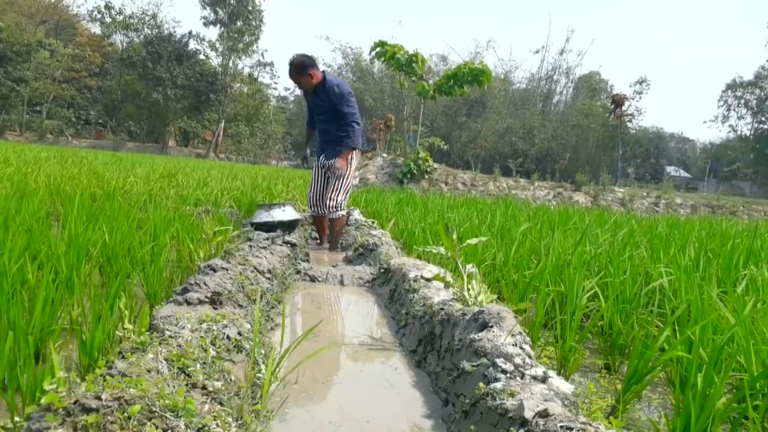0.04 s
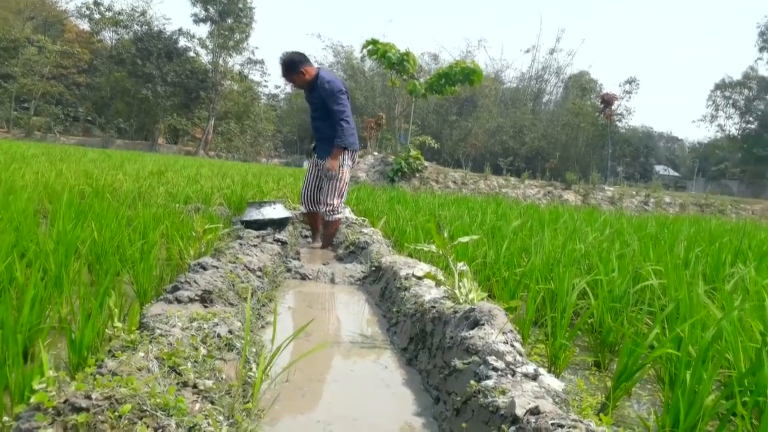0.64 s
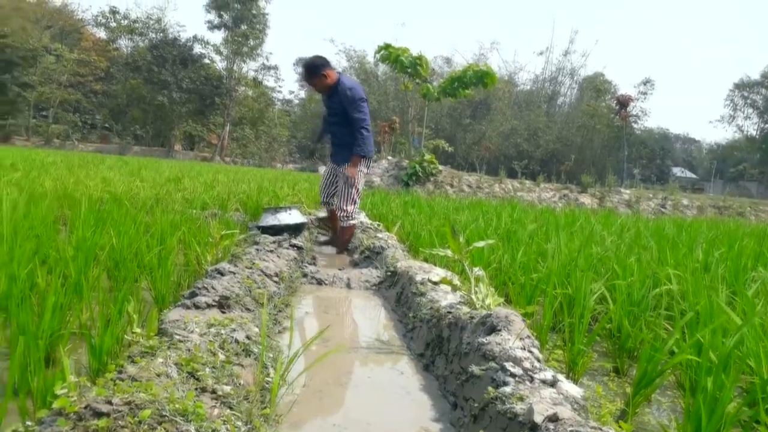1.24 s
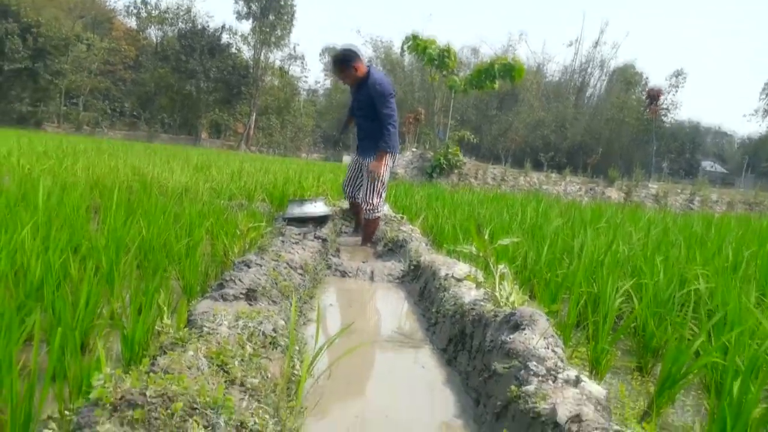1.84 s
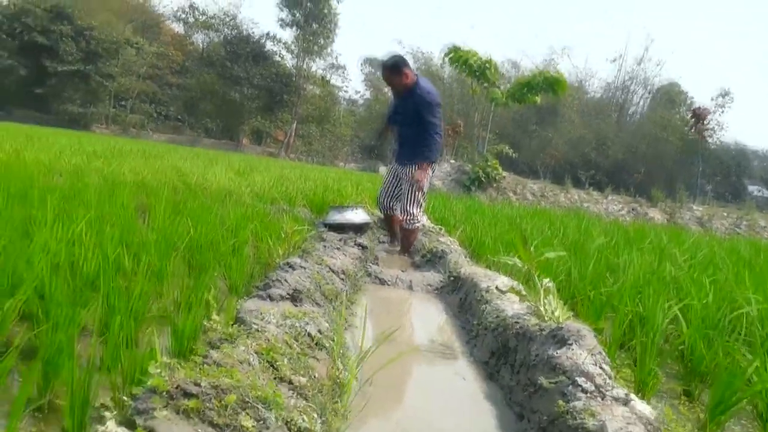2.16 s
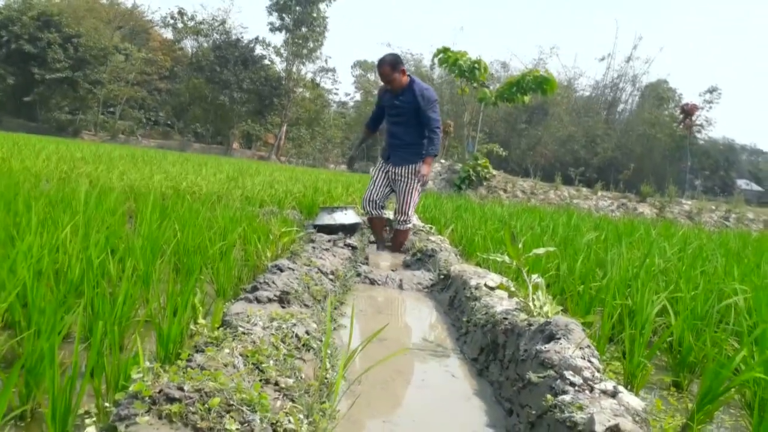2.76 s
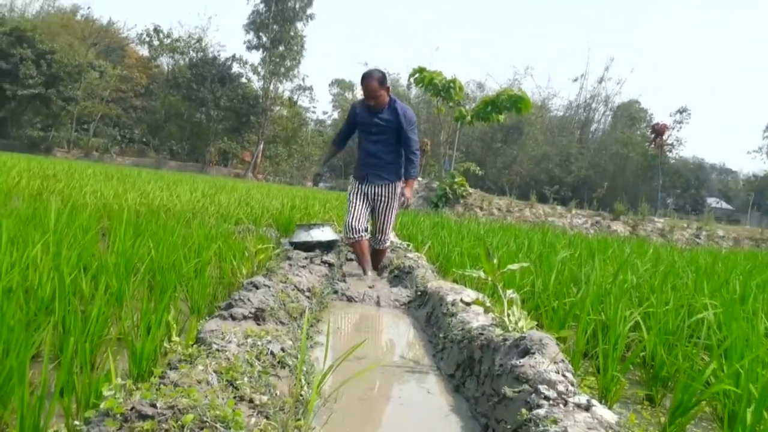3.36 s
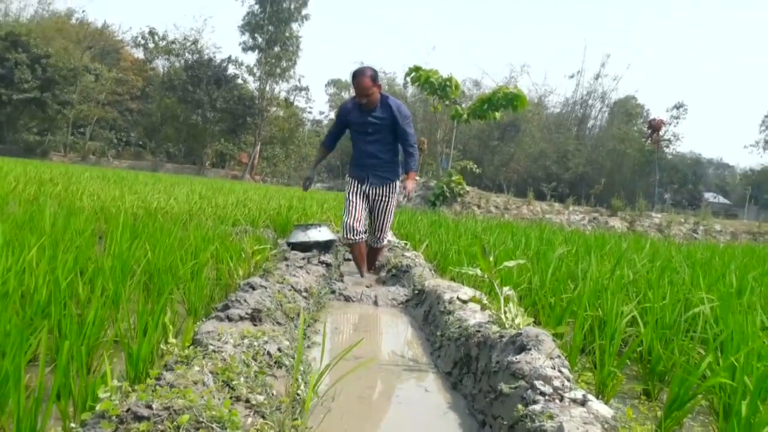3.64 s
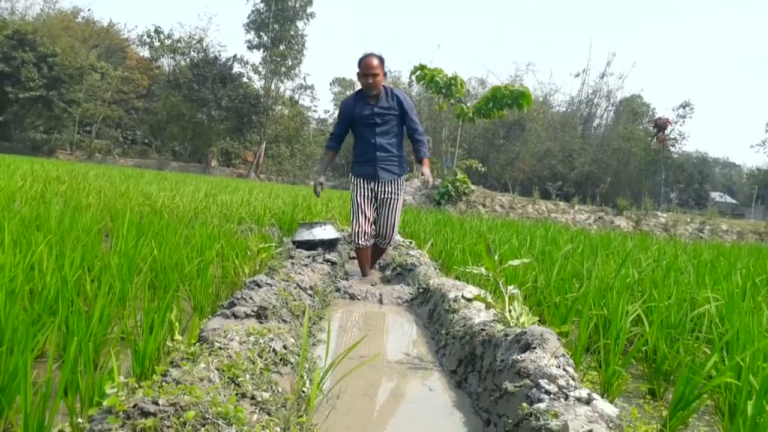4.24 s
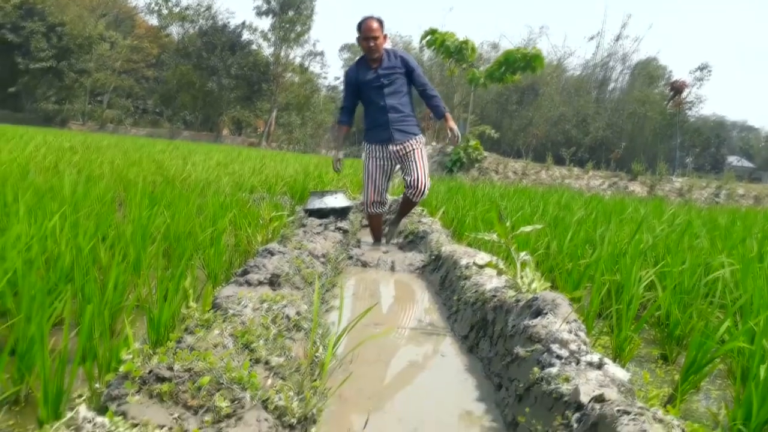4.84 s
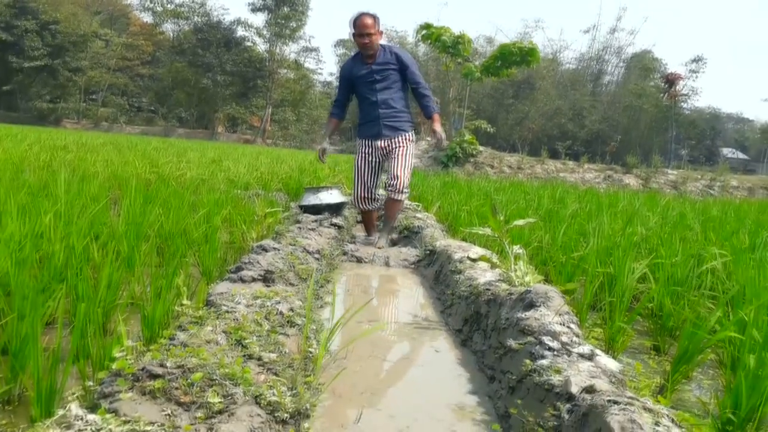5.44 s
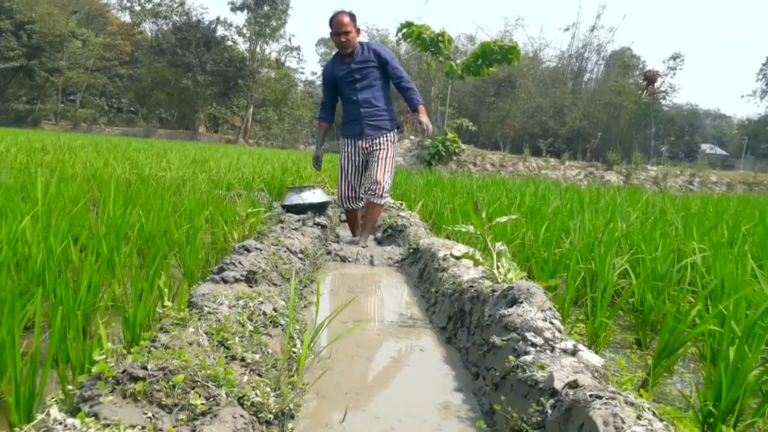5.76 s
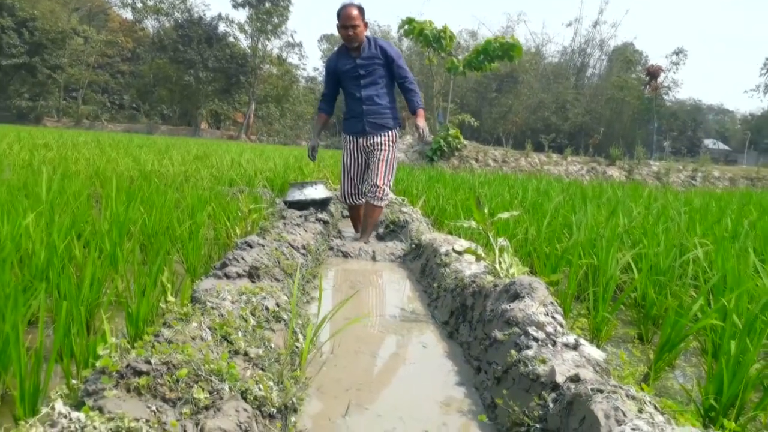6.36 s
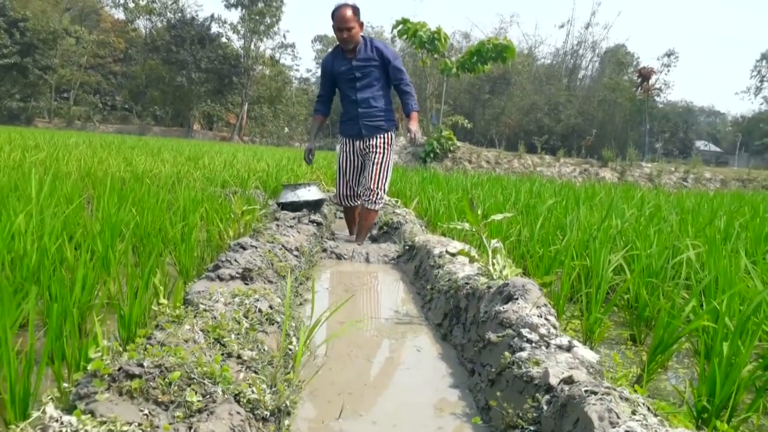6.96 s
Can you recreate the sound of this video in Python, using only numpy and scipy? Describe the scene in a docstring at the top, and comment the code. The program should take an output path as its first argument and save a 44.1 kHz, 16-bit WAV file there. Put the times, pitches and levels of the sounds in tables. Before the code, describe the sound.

Soft barefoot squelches in a wet, muddy channel under a repeating cuckoo whistle, other birds, crickets and a faint throbbing pump.

```python
"""A rice field. Small birds chirp first, over crickets, a far one-cylinder irrigation pump and low air hum.
From 0.5 s bare feet squelch along a muddy channel (air pockets pop, mud films snap, shallow water stirs)
and a cuckoo whistles about every 1.3 s. A kingfisher trills from 1.1 to 2.1 s. From 3.5 s hoarse calls
come from the trees. The heaviest step lands near 4.3 s; the small birds return near 5 s.
A tree line echoes all the birds."""
import sys
import numpy as np
from scipy import signal
from scipy.fft import rfft, irfft, next_fast_len
from scipy.io import wavfile
from scipy.ndimage import map_coordinates

SR = 44100
rng = np.random.default_rng(int(sys.argv[2]) if len(sys.argv) > 2 else 0)


def wav_record(signal):
    """Record a signal, one row per channel, as 16-bit PCM in the file named by sys.argv[1]."""
    frames = np.transpose(np.atleast_2d(signal))
    bounded = np.clip(frames, -1, 1)
    # unit amplitude maps onto the largest positive 16-bit level
    quanta = np.round(bounded * 32767).astype(np.int16)
    wavfile.write(sys.argv[1], SR, quanta)


N = 317961
T = np.arange(N) / SR

# Each row: crest time in seconds, dip pitch in Hz, crest pitch in Hz, level in dB before carry gain.
CUCKOO_CALLS = [(.638, 1312, 1579, -28), (2.002, 1358, 1650, -30.5), (3.335, 1474, 1664, -31),
                (4.68, 1500, 1740, -31.5), (5.915, 1538, 1780, -32.5), (7.27, 1477, 1703, -28)]
# How well the whistle carries. Each row: pitch in Hz, gain in dB.
CUCKOO_CARRY = [(1150, -8.5), (1350, -8), (1470, -5), (1560, 3), (1660, -2.5), (1780, -6)]
# Each row: middle in seconds, note level in dB, lead-in level in dB.
KINGFISHER_NOTES = [(1.16, -20, -19), (1.229, -16, -20.5), (1.302, -12.5, -29), (1.395, -17, -12.5),
                    (1.466, -17, -13), (1.538, -17, -16.5), (1.613, -16.5, -18), (1.68, -15, -20.5),
                    (1.753, -15.5, -24.5), (1.823, -15.5, -29.5), (1.897, -16, -33), (1.982, -18.5, -32)]
# Each row: time in seconds, pitch in Hz, base level in dB.
HOARSE_CALLS = [(3.472, 2780, -26), (4.058, 2800, -32), (4.629, 2674, -35), (5.199, 2810, -32),
                (5.901, 2760, -37.5), (6.76, 2940, -36.5)]
# Syllables of one call. Each row: delay and length in seconds, pitch ratio, glide in octaves, gain in dB.
HOARSE_PHRASE = [(0, .076, 0.99, -0.207, 2), (0.067, 0.066, .925, -0.174, 1)]
# Each row: middle and length in seconds, pitch in Hz, glide in octaves, relative level in dB.
SONGBIRD_CHIRPS = [(.008, 0.052, 2342, 0.38, -28.5), (.04, 0.19, 3675, -0.24, -41.5),
                   (.16, 0.13, 4880, 0.84, -44), (.23, 0.097, 4680, -1.1, -35.5),
                   (4.86, 0.16, 4440, -0.37, -43), (4.99, .07, 3160, -0.23, -35),
                   (5.052, 0.044, 3500, -0.66, -26.5), (5.07, 0.13, 4350, -0.32, -36.5)]
# Air pockets opening. Each row: start in seconds, relative level in dB, pitch in Hz, T60 in seconds.
AIR_POPS = [(.525, -13.5, 1324, .008), (.832, -13, 1240, 0.0053), (.854, -19, 2860, 0.016),
            (1.117, -17.5, 2100, 0.0086), (3.069, -29, 4930, .019), (3.49, -7.5, 1310, 0.004),
            (3.727, -13, 1780, 0.011), (4.2485, -2.5, 2120, 0.013), (4.268, -8, 1980, 0.011),
            (4.286, -4, 1390, 0.0076), (4.298, -27.5, 506, 0.16), (4.381, -13.5, 3040, 0.027),
            (4.513, -22.5, 832, 0.05), (4.538, -17, 2190, 0.022), (4.584, -16.5, 1144, 0.027),
            (5.113, -10.5, 2140, .027), (5.302, -14.5, 827, 0.029), (5.3028, -11.5, 2157, 0.022),
            (5.3525, -16.5, 2090, 0.031), (5.54, -22, 2150, .026), (5.572, -23.5, 1660, .029),
            (5.792, -13.5, 2710, 0.018), (5.99, -13, 2140, 0.0099), (6.256, -23.5, 1113, 0.068),
            (7.081, -18.5, 2240, 0.0082), (7.1845, -7, 2220, 0.029)]
# Shrinking suction cavities. Each row: as for AIR_POPS, then pitch rise in octaves.
SUCTION_SQUELCHES = [(.864, -26.5, 1534, 0.042, 2.2), (4.294, -17.5, 1485, 0.091, 2.4),
                     (6.29, -44, 1117, 0.09, 1.8), (7.13, -19.5, 943, 0.054, 0.87)]
# Mud films snapping. Each row: start in seconds, relative level in dB, pitch in Hz.
MUD_CLICKS = [(.601, -15, 7940), (.85, -18, 4800), (3.176, -25, 6300), (4.168, -17.5, 4270),
              (4.1833, -3.5, 7250), (4.307, -30, 7300), (4.387, -17, 8100), (4.413, -15, 5700),
              (4.516, -14.5, 7050), (4.678, -17, 8240), (5.113, -10.5, 8000), (5.16, -10.5, 7900),
              (5.214, -12.5, 8100), (5.226, -8, 7440), (5.353, -12, 7250), (5.541, -14.5, 7700),
              (5.571, -14.5, 11900), (5.652, -4, 6760), (5.822, -13.5, 7200), (6.182, -16.5, 4900),
              (7.082, -10.5, 8600), (7.097, -14, 8250), (7.184, -5.5, 6900)]
# Each row: peak time in seconds, relative level in dB, build-up and settling times in seconds.
FOOT_MOVES = [(0.539, -37.5, 0.06, 0.45), (1.12, -42.5, 0.08, 0.97), (4.13, -37.5, 0.022, 0.54),
              (4.305, -28.5, 0.11, 0.56), (5.26, -33.5, 0.4, 0.32), (5.798, -40.5, 1, 0.41),
              (6.698, -40.5, 0.043, 0.24), (7.16, -31.5, 0.18, 0.47)]
# Far insects. Each row: frequency in Hz, relative level in dB.
CHORUS_SPECTRUM = [(5400, -71), (5650, -12), (6280, -3), (6550, -12.5), (6800, -12.5), (7050, -17),
                   (7500, -20), (8050, -14.5), (8550, -8), (9050, -7), (9450, -52)]
# Each row: time in seconds, level in dB.
CRICKET_LEVELS = [(0, -48.5), (2.5, -49), (2.65, -70), (4.6, -51), (5.6, -45.5), (7.2, -53)]
# Each entry: end of a bush cricket's buzz in seconds.
BUZZ_ENDS_S = [1.631, 3.455, 5.22, 6.97]
# Pump pipe. Each row: frequency in Hz, relative level in dB, T60 in seconds.
EXHAUST_MODES = [(88, 5.5, 0.1), (120.5, -2.5, 0.23), (241, -15, 0.25)]
# Each row: frequency in Hz, relative level in dB.
AIR_SPECTRUM = [(25, -21), (55, 2.5), (110, -2), (170, -3.5), (420, -6), (560, -16.5), (900, -14.5),
                (2000, -20), (3700, -30.5), (11000, -35.5), (16000, -35)]
# Tree-line echo. Each row: frequency in Hz, T60 in seconds.
TREE_DECAY = [(500, 0.97), (2500, 0.61), (8000, 0.78)]


def cuckoo(sag_s=0.125, climb_s=0.145, drop_s=0.18, fall_s=0.075, fade_s=0.064, floor_hz=1090):
    """A pure, fluttering whistle sags, climbs to a crest and falls away."""
    out, t = np.zeros(N), np.arange(0, sag_s + climb_s + drop_s, 1 / SR)
    crest_s = sag_s + climb_s
    sag = 0.09 * np.maximum(1 - t / sag_s, 0) ** 2
    climb = np.sin(np.pi / 2 * np.clip((t - sag_s) / climb_s, 0, 1)) ** 2
    late = (np.maximum(t - crest_s, 0) / fall_s) ** 2.76
    swell = np.clip(np.minimum(t, t[-1] - t) / fade_s, 0, 1)
    for s, dip_hz, crest_hz, db in CUCKOO_CALLS:
        hz = dip_hz * (1 + sag) + (crest_hz - dip_hz) * climb + (floor_hz - crest_hz) * late / (1 + late)
        level_db = db + along(CUCKOO_CARRY, hz) + 4 * wobble(46.1, len(t))
        add(out, s - crest_s, swell * amp(level_db) * np.sin(phase(hz)))
    return out


def kingfisher(start_hz=2903, end_hz=2605, sink_s=0.302, tighten_s=0.23):
    """A trill sinks and tightens; each note is a flatter lead-in and a falling syllable."""
    rows = []
    for s, db, lead_db in KINGFISHER_NOTES:
        age_s = s - KINGFISHER_NOTES[0][0]
        hz = end_hz + (start_hz - end_hz) * np.exp(-age_s / sink_s)
        stretch = 1 + 0.76 * np.exp(-age_s / tighten_s)
        rows.append((s - 0.028, 0.024 * stretch, hz * 1.028 ** stretch, -0.08 * stretch, lead_db))
        rows.append((s, 0.035 * stretch, hz, -0.264, db))
    rows.append((2.094, 0.05, 2564, 0.278, -28.5))  # soft upward closing note
    return syllables(rows, second_db=-20.5, third_db=-25.5, waver=0.0072, rasp_db=2,
                     tract_db_per_oct=37, hold=0.88)


def hoarse_bird():
    """One rough, falling two-syllable phrase, repeated at varying pitch and level."""
    rows = [(s + delay_s, length_s, hz * ratio, glide_oct, db + gain_db)
            for s, hz, db in HOARSE_CALLS
            for delay_s, length_s, ratio, glide_oct, gain_db in HOARSE_PHRASE]
    return syllables(rows, second_db=-12.5, third_db=-20, waver=0.02, rasp_db=3,
                     tract_db_per_oct=16, hold=0.2)


def songbirds():
    """Thin, wavering chirps with weak harmonics."""
    return syllables(SONGBIRD_CHIRPS, second_db=-33, third_db=-46, waver=0.029, rasp_db=4,
                     tract_db_per_oct=10, hold=0)


def syllables(rows, second_db, third_db, waver, rasp_db, tract_db_per_oct, hold):
    """Each syllable lingers on its pitch (hold 0-1) and fades as it glides off the throat's resonance."""
    out = np.zeros(N)
    for s, length_s, hz, glide_oct, db in rows:
        u = np.linspace(-1, 1, int(length_s * SR))
        bend = u * (1 - hold + hold * u * u)
        octaves = glide_oct * bend / 2 - 0.27 * abs(glide_oct) * bend ** 2
        rad = phase(hz * 2 ** octaves * (1 + waver * wobble(703, len(u))))
        tone = np.sin(rad) + amp(second_db) * np.sin(2 * rad) + amp(third_db) * np.sin(3 * rad)
        level_db = db - tract_db_per_oct * abs(octaves) + rasp_db * wobble(497, len(u))
        add(out, s - length_s / 2, amp(level_db) * tone * (1 - u * u) ** 0.97)
    return out


def birds():
    """Near foliage smears the three higher voices; the tree line answers all four."""
    whistle, trill, calls, chirps = cuckoo(), kingfisher(), hoarse_bird(), songbirds()
    near = amp(-4.5) * echo(trill, t60_scale=0.12, onset_s=0.0056)
    near += amp(-10.5) * echo(chirps + calls, t60_scale=0.37, onset_s=0.0022)
    to_trees = amp(-8.5) * whistle + amp(-12) * trill + amp(-5) * (chirps + calls)
    far = echo(to_trees, t60_scale=1, onset_s=0.023)
    return whistle + trill + calls + amp(-2) * chirps + near + far


def pops(attack_s=0.00087, smack_t60_s=0.04):
    """Air pockets ring with a wet smack; squelches rise in pitch as the cavity shrinks."""
    rings, smacks, t = np.zeros(N), np.zeros(N), np.arange(SR // 8) / SR
    opening = 1 - np.exp(-t / attack_s)
    for s, db, hz, t60_s, rise_oct in [(*row, 0) for row in AIR_POPS] + list(SUCTION_SQUELCHES):
        octaves = rise_oct * np.minimum(t / t60_s, 1)
        rad = phase(hz * 2 ** octaves * (1 + 0.035 * wobble(456, len(t))))
        ring = np.sin(rad) + amp(-13 - 60 * t / t60_s) * np.sin(1.497 * rad)
        add(rings, s, amp(db + 5.5 - 60 * t / t60_s) * opening * ring)
        add(smacks, s, amp(db - 13 - 60 * t / smack_t60_s) * opening)
    hiss = noise([(200, -18), (800, -3), (2200, 11), (3500, -14), (6000, -4), (15000, -31.5)])
    return rings + smacks * hiss


def clicks(attack_s=0.00018, ring_t60_s=0.0065, crack_t60_s=0.02):
    """A snapping mud film gives a broad crack and a tiny high ring."""
    rings, cracks, t = np.zeros(N), np.zeros(N), np.arange(SR // 30) / SR
    tearing = 1 - np.exp(-t / attack_s)
    for s, db, hz in MUD_CLICKS:
        ring = np.sin(phase(hz * (1 + 0.012 * wobble(1200, len(t)))))
        add(rings, s, amp(db - 4 - 60 * t / ring_t60_s) * tearing * ring)
        add(cracks, s, amp(db - 9 - 60 * t / crack_t60_s) * tearing)
    hiss = noise([(500, -28), (2500, -9.5), (5000, -0.5), (8000, 5.5), (10000, -8.5), (15500, -7)])
    return rings + cracks * hiss


def stirred_water(range_db=17):
    """Each foot movement swells and settles, stirring up small bubbles and crackling mud."""
    slosh = grains(per_s=260, centre_hz=1964, spread=0.392, cycles=36, scatter_db=3.5)
    gurgle = grains(per_s=160, centre_hz=605, spread=0.32, cycles=9, scatter_db=1.5)
    crackle = grains(per_s=75, centre_hz=11160, spread=0.3, cycles=5.4, scatter_db=6.5)
    snaps = grains(per_s=40, centre_hz=7680, spread=0.11, cycles=6, scatter_db=3)
    wash = noise([(150, -31), (400, -12), (2500, -5), (4000, -17), (15000, -19.5)])
    wash *= amp(-10 + 4.1 * wobble(70))
    shallow = amp(-2.5) * slosh + amp(-8) * crackle + amp(-6.5) * snaps + wash
    swells = [amp(db - range_db * np.maximum((s - T) / build_s, (T - s) / settle_s))
              for s, db, build_s, settle_s in FOOT_MOVES]
    stir = np.max(swells, axis=0)
    depth = stir.max() * (stir / stir.max()) ** 1.62  # harder steps reach deeper water
    return stir * shallow + amp(-12) * depth * gurgle


def feet():
    """Bare feet in water and mud, with a faint foliage echo."""
    steps = stirred_water() + pops() + clicks()
    return steps + amp(-17) * echo(steps, t60_scale=0.34, onset_s=0.00079)


def insect_chorus():
    """Far insects merge into a flickering hiss with a faint high shimmer."""
    chorus = amp(-49 + 0.36 * wobble(1.4) + 0.87 * wobble(220)) * noise(CHORUS_SPECTRUM)
    return chorus + amp(-70 + 3 * wobble(2)) * band(12500, 400)


def cricket(chirp_hz=5.1, chirp_depth=0.57, stroke_hz=102):
    """Wing strokes pulse a narrow band, grouped into chirps."""
    chirps = np.sqrt(0.5 - 0.5 * chirp_depth * np.cos(2 * np.pi * chirp_hz * T))
    strokes = wing_strokes(stroke_hz + 2 * wobble(1.7), sharpness=0.22)
    return amp(curve(CRICKET_LEVELS)) * unit(chirps * strokes) * band(7880, 420)


def bush_cricket(length_s=0.72, stroke_hz=163):
    """Buzzes swell and stop; the wings slow as each one grows."""
    swell, u = np.zeros(N), np.linspace(0, 1, int(length_s * SR))
    for end_s in BUZZ_ENDS_S:
        add(swell, end_s - length_s, amp(-14 * (1 - u) ** 2))
    strokes = wing_strokes(stroke_hz - 22 * swell ** 8, sharpness=0.48)
    return amp(-42) * swell * strokes * band(6730, 270)


def wing_strokes(hz, sharpness):
    """One pulse per stroke, rms 1."""
    return unit(((1 + np.cos(phase(hz))) / 2) ** sharpness)


def pump(firing_hz=14.27, thud_db=-41, puff_db=-52):
    """Each firing rings the exhaust pipe and lets out a puff of gas."""
    thuds, t = np.zeros(N), np.arange(SR // 6) / SR
    pipe = sum(amp(db - 60 * t / t60_s) * np.sin(2 * np.pi * hz * t) for hz, db, t60_s in EXHAUST_MODES)
    thud = pipe * (1 - np.exp(-t / 0.0024))
    for s in np.arange(0, N / SR, 1 / firing_hz):
        add(thuds, s, amp(1.4 * rng.standard_normal()) * thud)
    gate = np.exp(-2 * (T * firing_hz % 1))
    puffs = unit(gate * noise([(40, -5), (130, 1), (400, -17.5), (700, -27)]))
    puffs = filtered(puffs, lambda hz: 1 / (1 + (hz / 900) ** 4))
    return amp(thud_db) * unit(thuds) + amp(puff_db) * puffs


def air(level_db=-42.5):
    """Low, even hum of open country."""
    return amp(level_db + wobble(8.7)) * noise(AIR_SPECTRUM)


def echo(x, t60_scale, onset_s):
    """Diffuse answer of foliage: a decaying noise tail with a soft start."""
    hz, t, spectra = signal.stft(rng.standard_normal(SR), SR, nperseg=256)
    t60_s = t60_scale * along(TREE_DECAY, hz)[:, None]
    tail = signal.istft(spectra * amp(-60 * t / t60_s), SR, nperseg=256)[1]
    tail *= 1 - np.exp(-(np.arange(len(tail)) / SR / onset_s) ** 2)
    return signal.fftconvolve(x, tail / np.linalg.norm(tail))[:N]


def grains(per_s, centre_hz, spread, cycles, scatter_db):
    """Damped rings of random time, pitch and size, rms 1."""
    count, t = int(per_s * N / SR), np.arange(SR // 100) / SR
    hz = np.clip(centre_hz * np.exp(spread * rng.standard_normal((count, 1))), 300, 15000)
    size = amp(scatter_db * np.minimum(rng.exponential(size=(count, 1)), np.pi))
    rings = size * np.sin(2 * np.pi * hz * t) * np.exp(-t * hz / cycles) * (1 - t / t[-1])
    indices = rng.integers(N, size=(count, 1)) + np.arange(len(t))
    return unit(np.bincount(indices.ravel(), rings.ravel(), N)[:N])


def noise(spectrum):
    """Noise shaped by (Hz, dB) points, rms 1."""
    return unit(filtered(rng.standard_normal(N), lambda hz: amp(along(spectrum, hz))))


def band(centre_hz, width_hz):
    """Narrow noise, rms 1."""
    return unit(filtered(rng.standard_normal(N), lambda hz: np.exp(-((hz - centre_hz) / width_hz) ** 2)))


def filtered(x, response):
    """Apply a gain given as a function of Hz."""
    size = next_fast_len(N + SR // 2)
    return irfft(rfft(x, size) * response(np.fft.rfftfreq(size, 1 / SR)), size)[:N]


def wobble(knots_per_s, size=N):
    """Smooth random curve."""
    knots = rng.standard_normal(int(size * knots_per_s / SR) + 4)
    return map_coordinates(knots, [np.arange(size) * knots_per_s / SR])


def along(points, hz):
    """Interpolate (Hz, value) points on a log axis."""
    point_hz, values = np.transpose(points)
    return np.interp(np.log(hz + 1), np.log(point_hz + 1), values)


def curve(points):
    """Interpolate (seconds, value) points per sample."""
    return np.interp(T, *np.transpose(points))


def add(track, s, sound):
    """Mix a sound in at s seconds."""
    i = round(s * SR)
    part = sound[max(-i, 0):max(N - i, 0)]
    track[max(i, 0):max(i, 0) + len(part)] += part


def phase(hz):
    """Running phase in radians."""
    return 2 * np.pi * np.cumsum(hz) / SR


def amp(db):
    """Decibels to gain."""
    return 10 ** (np.asarray(db) / 20)


def unit(x):
    """Scale to rms 1."""
    return x / np.sqrt(np.mean(x ** 2) + 1e-20)


def scene():
    """All sources at one microphone."""
    return (birds() + feet() + insect_chorus() + cricket() + bush_cricket() + pump() + air())[None]


def record(dry, bass_hz=36, top_hz=15900):
    """Cut deep bass and everything above the band limit."""
    return filtered(dry[0], lambda hz: (hz < top_hz) * hz ** 4 / (hz ** 4 + bass_hz ** 4))[None]


dry = scene()
out = record(dry)
wav_record(out)
```